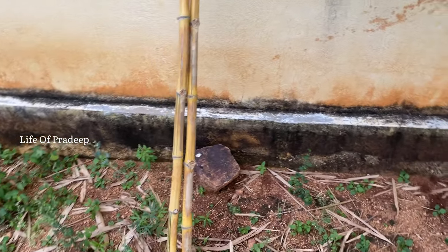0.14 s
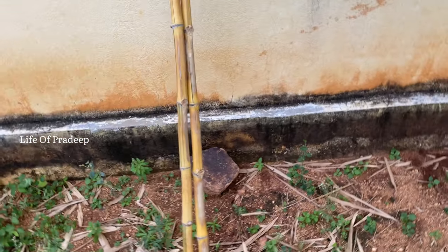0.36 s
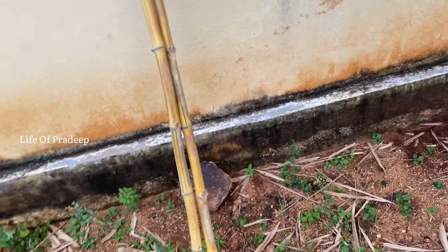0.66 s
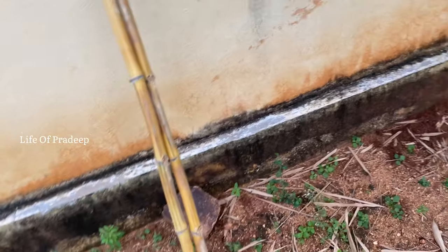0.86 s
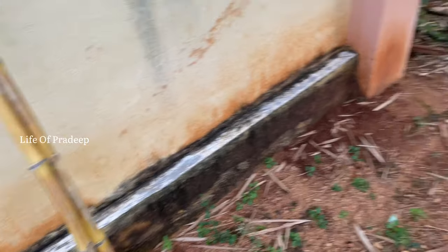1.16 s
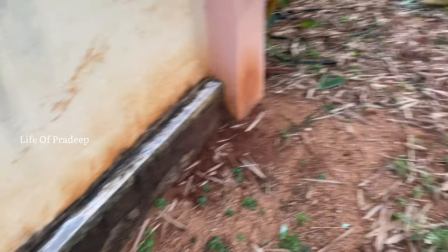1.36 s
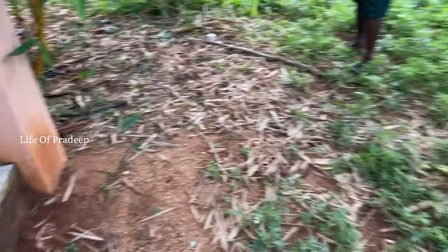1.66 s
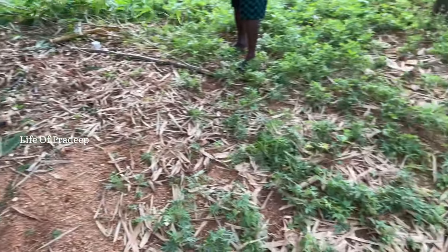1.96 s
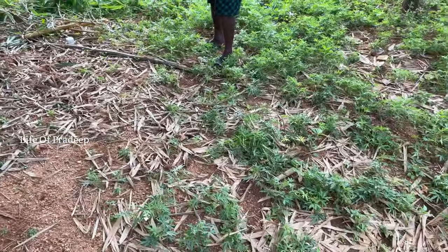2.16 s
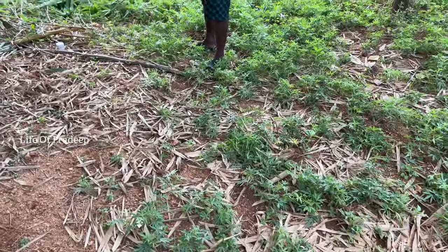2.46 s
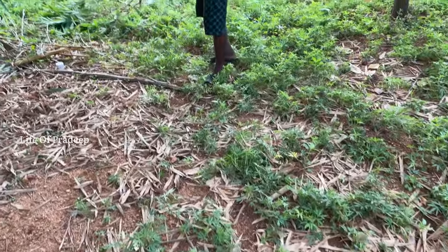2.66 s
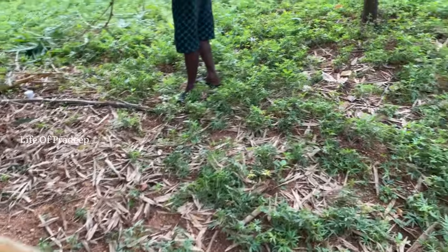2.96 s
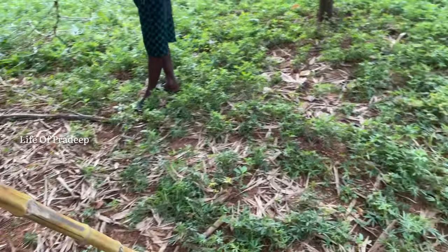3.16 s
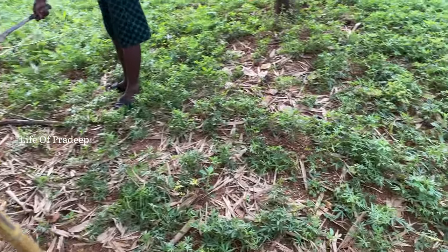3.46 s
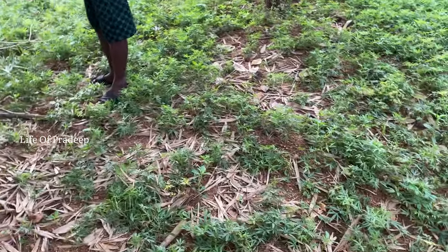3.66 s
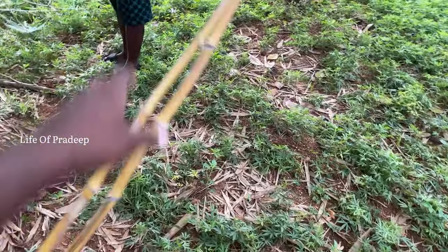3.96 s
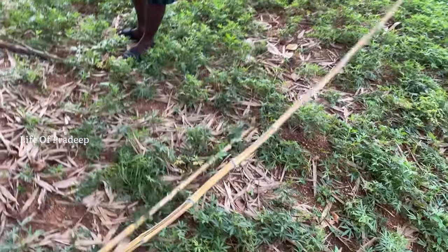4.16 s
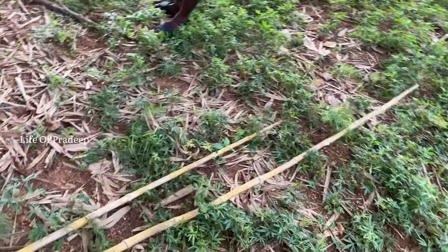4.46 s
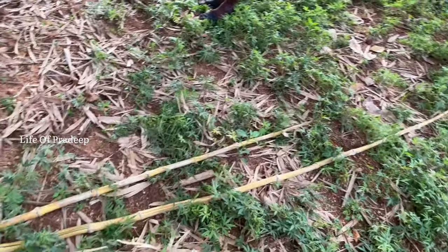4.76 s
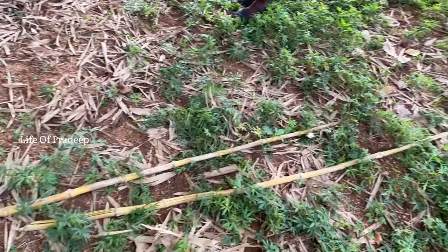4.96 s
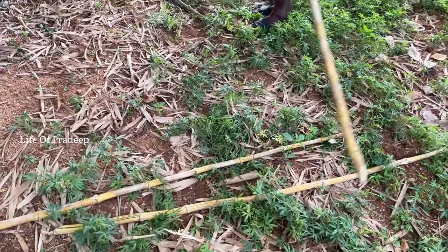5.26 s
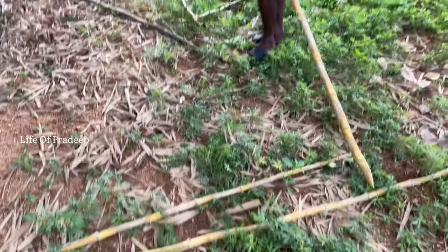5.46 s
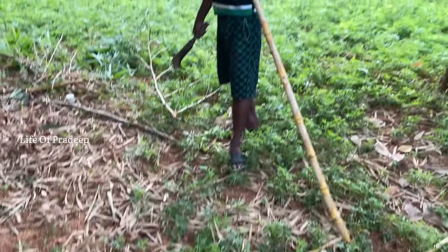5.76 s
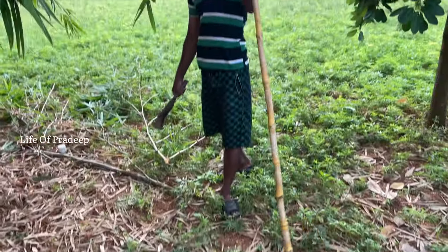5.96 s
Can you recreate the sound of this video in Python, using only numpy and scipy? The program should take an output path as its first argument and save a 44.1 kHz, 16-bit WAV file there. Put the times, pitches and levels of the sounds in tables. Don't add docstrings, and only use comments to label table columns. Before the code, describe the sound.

Outdoors, close to one microphone, the tail of a bamboo blow and shaking leaves fade at 0 s. Low soft steps, small twig ticks and light brushes of dry litter follow until a sharp, bright knife chop cracks at 1.74 s, with a very short hollow ring and rustling leaves. A small tap comes at 2.84 s, a second chop at 3.19 s, then a hard woody knock at 3.33 s and splinter ticks. A pole slides free at 3.9 s, poles clack around 4.0 s, and two crash into leaves at 4.16 and 4.27 s with low soil thuds, then bounce and rattle until 4.6 s. After quiet gritty ticks, the loudest, lower chop lands at 5.33 s, ringing slightly longer. Leaves settle; dry snaps and a brush end near 6.05 s. Faint traffic rumble, a wavering distant motor and thin insect trills continue beneath, with faint short echoes.

```python
import sys
import numpy as np
from scipy import signal
from scipy.fft import rfft, irfft
from scipy.io import wavfile
from scipy.ndimage import uniform_filter1d

SR = 44100
rng = np.random.default_rng(int(sys.argv[2]) if len(sys.argv) > 2 else 0)


def generate_wav(signal):
    frames = np.transpose(np.atleast_2d(signal))
    scaled = np.clip(frames, -1, 1) * 32767
    pcm = np.round(scaled).astype(np.int16)
    wavfile.write(sys.argv[1], SR, pcm)


def convert_level_to_amplitude(level_db):
    exponent = np.asarray(level_db, float) / 20
    return 10 ** exponent


N = 269451

# start_s, level_db, pitch_hz, tear_s, t60_s
KNIFE_BLOWS = [
    (1.7412, -3.5, 2640, 0.0098, 0.012),
    (3.194, -5.5, 2640, 0.0081, 0.049),
    (5.3321, -0.5, 1890, 0.0077, 0.073),
]
# start_s, level_db, pitch_hz, tear_s, t60_s
EARLIER_BLOW = [
    (0, -8, 2100, 0.0035, 0.1),
]
# pitch_hz, level_db, t60_s
STEM_MODES = [(1640, 18.5, 0.03), (1930, 0, 0.11), (2190, -4, 0.078), (2440, 0, 0.088), (2690, 17, 0.023),
              (3200, -29, 0.074), (4120, -35, 0.078), (5670, 9, 0.03)]
# start_s, level_db, pitch_hz, t60_s
WALL_GROANS = [
    (1.742, -16, 1080, 0.05),
    (1.743, -10, 2300, .03),
    (3.195, -20, 620, 0.07),
    (3.196, -2.5, 2140, 0.025),
    (4.019, -23, 930, 0.19),
    (4.166, -17, 2000, 0.1),
    (5.334, -8, 1900, 0.12),
    (5.333, -11, 3700, .08),
]
# start_s, level_db, pitch_hz, t60_s
CHAMBER_RINGS = [(1.742, -41, 970, .025), (1.743, -37, 593, 0.07), (1.745, -25, 317, 0.048),
                 (1.7438, -5, 5670, 0.03), (1.743, -18, 1700, 0.027), (1.742, -4.5, 2880, 0.037),
                 (2.84, -25, 314, 0.037), (3.195, -11.5, 1886, 0.051), (3.195, -25, 1023, 0.05),
                 (3.196, -24, 552, 0.044), (3.327, -15, 1163, 0.021), (3.911, -32.5, 630, 0.033),
                 (3.914, -30, 1130, .04), (4.019, -21.5, 678, 0.066), (4.021, -40, 1080, 0.086),
                 (4.021, -43, 458, 0.11), (4.168, -15, 350, 0.04), (4.168, -48, 620, 0.025),
                 (4.286, -19, 713, 0.096), (3.991, -34, 890, 0.026), (5.339, -18, 986, 0.052),
                 (5.336, -18, 695, 0.085), (5.337, -8, 1640, .055), (5.34, -9, 2190, 0.05),
                 (5.338, -27, 325, 0.084)]
# start_s, level_db, first_hz, last_hz, length_s
PITCH_GLIDES = [
    (2.8372, -30, 1150, 330, .011),
    (1.742, -7, 1400, 3700, .019),
]
# start_s, level_db, pitch_hz, t60_s, hiss_db
POLE_CRASHES = [
    (4.1633, 4, 4440, 0.021, -16),
    (4.268, 4.5, 3660, 0.0089, -6),
    (4.278, 4, 2500, 0.023, -3.5),
    (4.2857, -5, 1880, 0.092, -5.5),
]
# start_s, level_db, pitch_hz, tear_s, t60_s
POLE_SLIDE = [
    (3.9093, -10.5, 2380, 0.011, 0.04),
]
# start_s, level_db, pitch_hz, t60_s, hiss_db
POLE_KNOCKS = [
    (3.3265, 1, 2730, 0.021, -34),
    (3.989, -6.5, 3700, 0.056, -12.5),
    (4.0172, -6.5, 2600, 0.059, -27),
    (4.39, -12, 3200, 0.018, -24),
    (3.401, -13.5, 2900, 0.04, -22),
]
# start_s, level_db, pitch_hz, t60_s
SOIL_THUDS = [(.355, -41, 56, 0.15), (0.393, -29.5, 102, 0.046), (1.751, -33, 129, 0.11),
              (3.196, -33, 316, 0.072), (3.25, -34, 259, 0.15), (3.911, -37, 208, 0.057),
              (3.993, -32.5, 118, 0.13), (4.019, -40, 110, 0.21), (4.167, -5.5, 150, 0.037),
              (4.194, -24.5, 85, 0.06), (4.245, -35, 200, 0.037), (4.273, -11, 142, 0.071),
              (4.284, -20, 240, 0.048), (4.355, -21.5, 209, 0.045), (4.476, -34, 217, 0.057),
              (4.629, -40, 132, 0.075), (4.651, -45, 189, .072), (5.349, -17, 124, 0.062),
              (5.362, -24.5, 165, 0.083), (5.508, -37.5, 134, 0.074), (5.642, -48, 147, 0.1)]
# start_s, level_db, pitch_hz, t60_s
DEEP_HEAVES = [
    (.125, -42, 70, .12),
    (.2, -39, 58, .2),
    (.29, -38, 62, .12),
    (4.175, -13, 95, .05),
    (4.288, -17, 80, .08),
    (5.35, -24, 200, .07),
]
# start_s, level_db, pitch_hz, hiss_db
TWIG_TICKS = [(0.2473, -19, 5770, -13), (0.7985, -23.5, 4590, -10.5), (1.402, -25, 6640, -6),
              (1.6132, -32, 1090, 6), (1.8591, -20, 1300, -10.5), (3.024, -34, 8380, -2),
              (3.052, -27, 3500, -4), (3.2174, -18, 1870, -5), (3.6591, -28, 4920, -16),
              (4.0738, -15, 2660, -16), (4.3962, -15, 1730, -19), (4.4897, -13.5, 1990, -10),
              (4.5035, -13, 1900, -14), (4.51, -14, 2040, -35), (4.5135, -12, 7300, -28),
              (4.593, -19, 2400, -4), (4.618, -21, 3530, -10.5), (4.8205, -37, 7620, 6),
              (5.0693, -32, 7000, -13), (5.285, -35, 1250, -38), (5.398, -21, 3470, 7.5),
              (5.4994, -23, 4500, 4), (5.5978, -29.5, 8000, -1), (5.8013, -21.5, 3200, 0)]
# start_s, level_db, pitch_hz, hiss_db
SPLINTER_SNAPS = [(3.2405, -15, 9500, -4), (3.286, -22, 8000, -5), (3.32, -26, 5000, -10),
                  (4.014, -17, 8500, -20), (4.067, -16.5, 5000, -22), (4.104, -25, 8200, -8),
                  (6.038, -16, 5000, -13), (6.063, -25, 5000, -10), (6.099, -17, 3950, -4),
                  (1.635, -32.5, 6000, -4)]
# start_s, level_db, pitch_hz, t60_s, hiss_db
SETTLING = [(1.753, -11, 2930, .1, -1.5), (3.206, -13.5, 2380, 0.12, 2.5), (3.238, -27, 4000, 0.13, 4),
            (3.332, -20, 3000, 0.074, -13), (3.997, -25.5, 3100, 0.059, 3), (5.356, -16, 2400, 0.12, -15),
            (.12, -41, 444, 1, -30), (2.05, -39, 560, .3, -20), (3.251, -34, 300, 0.31, -30),
            (5.94, -28.5, 1000, 0.26, -30)]
# start_s, level_db, pitch_hz, hiss_db
LITTER_BRUSHES = [(.379, -29, 3410, -8), (0.743, -26.5, 2090, 2), (1.47, -32, 2200, 0.1),
                  (1.4183, -29.5, 3770, 7), (3.932, -25, 3060, -1), (4.065, -21, 2650, -19),
                  (4.1, -19, 2900, -8), (4.157, -28, 4480, -10), (4.175, -9.5, 3600, -5),
                  (4.2363, -33, 4440, -4), (4.2998, -8.5, 3550, -6), (4.44, -16, 3060, -6),
                  (4.5316, -26, 4400, -16), (4.704, -23, 2800, -5), (4.7676, -30, 4400, -17),
                  (5.03, -40, 1600, -10), (5.238, -37, 3500, -16), (5.4596, -29, 3520, 0),
                  (5.5025, -20.5, 3240, -7), (5.762, -40.5, 4970, 3), (5.8016, -29, 2940, -7),
                  (5.8784, -32, 1790, -4), (5.948, -27.5, 2680, 7.5), (6.035, -10.5, 4150, -8)]
# start_s, level_db, pitch_hz, hiss_db
LITTER_SWEEPS = [
    (0.664, -29, 4840, -2.1),
    (.7135, -27, 3760, 2.8),
    (1.015, -44, 1860, 14.5),
    (1.399, -34, 1930, 7),
    (4.999, -45, 2400, 14),
]
TEAR_S = dict(knock=0.0027, crash=0.0035, wall=0.0043, twig=.001, splinter=.003, swish=0.0043, aftermath=.01, sweep=0.012)
T60_S = dict(twig=0.034, splinter=0.026, swish=0.055, sweep=0.21)
# pitch_hz, level_db (per Hz)
LEAF_SPECTRUM = [(150, -11), (250, -4.5), (436, -4.5), (629, -2.5), (971, -1), (1700, 2.5), (5730, 5),
                 (9660, 3), (13000, -2.5), (14900, 0.5), (16000, 3)]
# peak_s, level_db, swell_db_per_s, settle_db_per_s, extra_fizz_db
LEAF_SHAKES = [(0, -29, 99, 119, -1), (0, -37.5, 99, 34, -0.7), (.85, -51.5, 26, 40, 0.4),
               (1.62, -63, 36, 15, -2), (1.25, -61.5, 19, 16, 1), (1.9, -42, 80, 36.5, 1.3),
               (1.8, -43, 403, 52, 1.2), (2.3, -49.5, 18.5, 11.5, 1), (2.8, -56, 26, 57.5, -1.5),
               (3.12, -55.5, 65, -8, -10), (3.24, -37, 395, 46, 0.5), (3.43, -43, 64, 26.5, 1.2),
               (4.03, -47.5, 73, 23, -9), (4.37, -43, 59, 43, 2), (4.5, -42, 35, 86, -1),
               (4.58, -44, 46, 122, -6), (4.95, -55.5, 38, 77, 1), (5.1, -63, 40, 10, -5),
               (5.44, -53.5, 187.5, 14, -2), (5.88, -48.5, 83, -1, -0.5), (6.11, -44, 57, 50, 1.5)]
# start_s,
# level_db, pitch_hz, hiss_db
GRIT_TICKS = [(.856, -30, 3800, -10), (.9, -32, 6500, -10), (0.93, -30, 7000, -8), (1.418, -23, 6560, -12),
              (1.612, -27, 4600, -15), (5.013, -29, 8770, -8), (5.02, -28, 10500, -10),
              (5.028, -23, 10000, -15), (5.036, -26, 9800, -15), (4.7, -23, 3000, -8),
              (5.07, -22, 9000, -4), (5.238, -28, 5300, -14), (5.227, -37, 11500, -20),
              (5.322, -36, 11000, -10), (4.7673, -28, 4200, -14), (4.593, -23, 5500, -10),
              (4.074, -13, 5600, -20), (4.097, -22.5, 4500, -15), (3.321, -13, 3800, -4),
              (3.321, -20, 1100, -30), (3.218, -16, 5000, -8), (5.935, -30, 1500, -25),
              (1.7393, -16, 2200, -6), (3.191, -20, 3000, -10), (4.385, -20, 3500, -8),
              (4.473, -20, 2900, -15), (4.509, -12, 2000, -25), (4.509, -16, 6500, -20),
              (4.515, -12, 3400, -20), (4.515, -15, 1900, -25), (4.533, -19, 4000, -15),
              (4.617, -23, 4400, -6), (.2475, -22, 7200, -15), (.382, -28, 1180, -20),
              (6.066, -26, 3000, -15), (5.575, -30, 3200, -15), (5.602, -31, 3200, -15)]
# start_s, level_db, pitch_hz, t60_s, hiss_db
STRIP_RATTLES = [
    (3.4, -22.5, 1050, .05, -30),
    (4.021, -18.5, 1700, .12, -14),
    (4.03, -25, 800, .12, -30),
    (4.078, -25, 2300, .06, -25),
    (4.11, -29, 2300, 0.07, -8),
    (3.95, -31, 2300, 0.1, -15),
    (5.505, -25.5, 2180, .09, -15),
    (6.04, -25, 1500, 0.07, -25),
]
# pitch_hz, level_db (per Hz)
RUMBLE_SPECTRUM = [(15, -47.5), (25, -10), (45, 1), (64, 8.5), (136, 2.5), (198, -4), (264, -6.5),
                   (404, -13.5), (500, -44), (650, -27), (1100, -120)]
# time_s, level_db
RUMBLE_LEVEL = [(0.0, -47.5), (0.4, -57.5), (2.1, -53.5), (2.6, -57.5), (4.1, -56.5), (4.45, -45),
                (4.7, -57), (5.0, -60), (6.11, -54.5)]
# shaft_order, level_db
MOTOR_ORDERS = [(4, -66), (6, -63), (7, -58.5), (8, -65), (9, -69), (11, -71), (2.3, -62)]
# time_s, speed_hz
MOTOR_SPEED = [(0.5, 27.7), (0.62, 27.6), (2.3, 28.4), (2.44, 28.0), (3.0, 29.0)]
# time_s, level_db
MOTOR_LEVEL = [(0, -9), (.6, -5), (1.0, 0), (1.7, 0), (2.7, -2), (3.1, -10), (6.11, -12)]
# pitch_hz, width_hz, level_db
INSECT_TRILLS = [(7600, 120, -65), (5740, 400, -68), (6500, 150, -72)]
# pitch_hz, level_db (per Hz)
STILL_TREES = [(300, -12), (600, -12.5), (1500, -2.5), (2300, -5.5), (3200, -21), (5300, -16),
               (9000, -13.5), (16000, -23)]


def evened(x):
    return x / np.sqrt(np.mean(x ** 2) + 1e-20)


def add(mix, start_s, sound):
    part = mix[round(start_s * SR):][:len(sound)]
    part += sound[:len(part)]


def highpass(x, order, hz):
    return signal.sosfilt(signal.butter(order, hz, "high", fs=SR, output="sos"), x)


def resonate(x, hz, width_hz):
    r = np.exp(-np.pi * width_hz / SR)
    return evened(signal.lfilter([1, 0, -1], [1, -2 * r * np.cos(2 * np.pi * hz / SR), r * r], x))


def band(x, low_hz, high_hz):
    return evened(signal.sosfilt(signal.butter(2, [low_hz, high_hz], "band", fs=SR, output="sos"), x))


def coloured(x, spectrum):
    hz, level_db = np.transpose(spectrum)
    bins_hz = np.fft.rfftfreq(len(x), 1 / SR)
    gain = convert_level_to_amplitude(np.interp(np.log(bins_hz + 1), np.log(hz + 1), level_db))
    return evened(irfft(rfft(x) * gain, len(x)))


def snaps(size, spread_db, grain):
    sizes = np.minimum(rng.exponential(1, size // grain + 1), 5)
    lumps = np.repeat(sizes, grain)[:size]
    return evened(rng.standard_normal(size) * convert_level_to_amplitude(spread_db * lumps))


def crack(start_s, level_db, pitch_hz, tear_s, t60_s, hiss_db, click_db, ring_db, rise_s, lead_s, sharp,
          treble_speed, trim_db, lumps_db=3.0, size=12000):
    t = np.arange(size) / SR - lead_s
    after = np.maximum(t - tear_s, 0) / t60_s
    touch = convert_level_to_amplitude(-12.5 + 14 * np.minimum(t, 0) / lead_s)
    tearing = 1 - np.exp(-np.maximum(t, 0) / rise_s)
    fibres = snaps(size, lumps_db, grain=22) * np.maximum(touch, tearing)
    fibres[round(lead_s * SR)] += convert_level_to_amplitude(click_db)

    width_hz = pitch_hz / sharp
    body = resonate(resonate(fibres, pitch_hz, width_hz), pitch_hz, 3 * width_hz) * convert_level_to_amplitude(-60 * after)
    hiss = band(fibres, min(1.26 * pitch_hz, 7000), 11940) * convert_level_to_amplitude(hiss_db - 60 * treble_speed * after)

    u = np.arange(3500) / SR
    modes = sum(convert_level_to_amplitude(db - 60 * u / decay_s) * np.sin(2 * np.pi * hz * u) for hz, db, decay_s in STEM_MODES)
    ring = signal.fftconvolve(fibres * convert_level_to_amplitude(-120 * after), modes)[:size]
    ring = 2 * convert_level_to_amplitude(ring_db) * ring / abs(ring).max()

    sound = highpass(body + hiss + ring, 2, 0.1 * pitch_hz)
    return max(start_s + 0.00063 - lead_s, 0), convert_level_to_amplitude(level_db + trim_db) * sound


def thump(start_s, level_db, pitch_hz, t60_s, swell_s, noise, sag, heave_db):
    t = np.arange(12000) / SR
    turns = pitch_hz * (t + sag * 0.016 * (1 - np.exp(-t / 0.012)))
    rough = noise * resonate(rng.standard_normal(len(t)), pitch_hz, pitch_hz * 0.81)
    tone = np.sin(2 * np.pi * turns) + rough
    heave = convert_level_to_amplitude(heave_db) * np.sin(2 * np.pi * turns * 0.536)
    envelope = convert_level_to_amplitude(level_db - 60 * t / t60_s) * (1 - np.exp(-t / swell_s))
    return start_s, envelope * (tone + heave)


def glide(start_s, level_db, first_hz, last_hz, length_s):
    t = np.arange(3000) / SR
    glide_s = length_s * .35
    turns = last_hz * t + (first_hz - last_hz) * glide_s * (1 - np.exp(-t / glide_s))
    envelope = convert_level_to_amplitude(level_db - 40 * (t / length_s) ** 2) * np.minimum(t / .0015, 1)
    return start_s, envelope * np.sin(2 * np.pi * turns)


def knife_blows():
    out = np.zeros(N)
    for row in KNIFE_BLOWS:
        hiss_db = -15 + 22 * np.log2(row[2] / 2000)
        add(out, *crack(*row, hiss_db, click_db=20.5, ring_db=-4, rise_s=0.00011, lead_s=.003,
                        sharp=0.98, treble_speed=2.1, trim_db=-8.5))
    tail = crack(*EARLIER_BLOW[0], -6, click_db=0, ring_db=-7, rise_s=0.0002, lead_s=0.00104,
                 sharp=0.91, treble_speed=3.2, trim_db=-7)[1]
    add(out, 0, tail[100:])
    for s, db, hz, t60_s in WALL_GROANS:
        add(out, *crack(s, db, hz, TEAR_S["wall"], t60_s, -17, click_db=10, ring_db=-9, rise_s=0.00047,
                        lead_s=.0025, sharp=1.32, treble_speed=1.7, trim_db=-12))
    for row in CHAMBER_RINGS:
        add(out, *thump(*row, swell_s=0.0023, noise=.55, sag=.02, heave_db=-30))
    for row in PITCH_GLIDES:
        add(out, *glide(*row))
    return out


def thrown_poles():
    out = np.zeros(N)
    for s, db, hz, t60_s, hiss_db in POLE_KNOCKS:
        add(out, *crack(s, db, hz, TEAR_S["knock"], t60_s, hiss_db, click_db=24.5, ring_db=-12,
                        rise_s=0.00031, lead_s=0.0018, sharp=1.67, treble_speed=1.3, trim_db=-16))
    heavy = [(s, db, hz, TEAR_S["crash"], t60_s, hiss_db) for s, db, hz, t60_s, hiss_db in POLE_CRASHES]
    heavy.append((*POLE_SLIDE[0], -1.5))
    for row in heavy:
        add(out, *crack(*row, click_db=12.5, ring_db=-12, rise_s=0.00043, lead_s=.007,
                        sharp=1.28, treble_speed=1.6, trim_db=-12, lumps_db=2.4))
    for row in SOIL_THUDS:
        add(out, *thump(*row, swell_s=0.003, noise=0.52, sag=0.23, heave_db=-10))
    return out


def twigs_and_splinters():
    out = np.zeros(N)
    for kind, table in [("twig", TWIG_TICKS), ("splinter", SPLINTER_SNAPS)]:
        for s, db, hz, hiss_db in table:
            add(out, *crack(s, db, hz, TEAR_S[kind], T60_S[kind], hiss_db, click_db=14, ring_db=-24,
                            rise_s=0.00074, lead_s=0.000904, sharp=1.8, treble_speed=1.5, trim_db=-13))
    return out


def brushed_litter():
    out = np.zeros(N)
    soft = [(s, db, hz, TEAR_S["swish"], T60_S["swish"], hiss_db) for s, db, hz, hiss_db in LITTER_BRUSHES]
    soft += [(s, db, hz, TEAR_S["aftermath"], t60_s, hiss_db) for s, db, hz, t60_s, hiss_db in SETTLING]
    for row in soft:
        add(out, *crack(*row, click_db=-20, ring_db=-47, rise_s=0.0051, lead_s=0.0048,
                        sharp=1, treble_speed=1, trim_db=-12, lumps_db=1.6))
    for s, db, hz, hiss_db in LITTER_SWEEPS:
        add(out, *crack(s, db, hz, TEAR_S["sweep"], T60_S["sweep"], hiss_db, click_db=-20, ring_db=-47,
                        rise_s=0.012, lead_s=0.011, sharp=1, treble_speed=1, trim_db=-12.5))
    return out


def scattered(dry_sound):
    t = np.arange(8000) / SR
    echoes = rng.standard_normal(len(t)) * (rng.random(len(t)) < .15)
    echoes = echoes * convert_level_to_amplitude(-60 * t / 0.48) * (t > .003)
    echoes = signal.lfilter([1, -.9], [1], echoes)
    echoes = echoes / np.linalg.norm(echoes)
    return dry_sound + convert_level_to_amplitude(-16) * signal.fftconvolve(dry_sound, echoes)[:N]


def patchy(shape, bins, frames):
    return evened(uniform_filter1d(uniform_filter1d(rng.standard_normal(shape), bins, 0), frames, 1))


def shaking_leaves():
    rustle = coloured(snaps(N, spread_db=.9, grain=40), LEAF_SPECTRUM)
    hz, t, z = signal.stft(rustle, SR, nperseg=256, noverlap=192)
    patches = patchy(z.shape, 6, 30)
    crackles = patchy(z.shape, 9, 3)
    z = z * convert_level_to_amplitude(1.3 * patches + 1.5 * np.maximum(crackles, 0) ** 1.5)

    peak_s, level_db, swell, settle, extra_db = np.transpose(LEAF_SHAKES)[:, :, None]
    blades_db = level_db - np.where(t < peak_s, abs(swell) * (peak_s - t), abs(settle) * (t - peak_s))
    stems_db = -7.5 + 0.94 * (blades_db + 45) - 45.5
    edges_db = blades_db + 3.5 + extra_db
    zones = [(hz < 1500, stems_db), ((hz >= 1500) & (hz < 6000), blades_db), (hz >= 6000, edges_db)]
    gain_db = np.zeros(z.shape)
    for zone, shakes_db in zones:
        wanted = convert_level_to_amplitude(2 * shakes_db).sum(0) + 1e-9
        present = (abs(z[zone]) ** 2).sum(0).mean()
        gain_db[zone] = 10 * np.log10(wanted / present)
    z = z * convert_level_to_amplitude(uniform_filter1d(gain_db, 7, 0) + 2.5)
    return signal.istft(z, SR, nperseg=256, noverlap=192)[1][:N]


def underfoot():
    out = np.zeros(N)
    for s, db, hz, hiss_db in GRIT_TICKS:
        add(out, *crack(s, db, hz, .0008, .014, hiss_db, click_db=14, ring_db=-50, rise_s=.0003, lead_s=.0006,
                        sharp=2.4, treble_speed=1.3, trim_db=-12, lumps_db=1.5, size=2000))
    for s, db, hz, t60_s, hiss_db in STRIP_RATTLES:
        add(out, *crack(s, db, hz, .005, t60_s, hiss_db, click_db=-10, ring_db=-40, rise_s=.002, lead_s=.002,
                        sharp=1.4, treble_speed=1.3, trim_db=-12, lumps_db=2.5, size=5000))
    for row in DEEP_HEAVES:
        add(out, *thump(*row, swell_s=.008, noise=.2, sag=.2, heave_db=-30))
    return out


def far_motor():
    t = np.arange(N) / SR
    shaft = np.cumsum(np.interp(t, *np.transpose(MOTOR_SPEED))) / SR
    tones = sum(convert_level_to_amplitude(db + 1.5) * np.sin(2 * np.pi * (order * shaft + rng.random())) for order, db in MOTOR_ORDERS)
    return tones * convert_level_to_amplitude(np.interp(t, *np.transpose(MOTOR_LEVEL)))


def insects():
    out = np.zeros(N)
    for hz, width_hz, db in INSECT_TRILLS:
        throb = evened(uniform_filter1d(uniform_filter1d(rng.standard_normal(N), 1500), 1500))
        out += convert_level_to_amplitude(db + 3 * throb) * resonate(rng.standard_normal(N), hz, width_hz)
    return out


def far_air():
    level_db = np.interp(np.arange(N) / SR, *np.transpose(RUMBLE_LEVEL))
    rumble = coloured(rng.standard_normal(N), RUMBLE_SPECTRUM) * convert_level_to_amplitude(level_db)
    air = convert_level_to_amplitude(-57.5) * coloured(rng.standard_normal(N), [(150, -43)] + STILL_TREES)
    return rumble + air


def scene():
    bamboo = scattered(knife_blows() + thrown_poles() + twigs_and_splinters() + brushed_litter())
    near = bamboo + shaking_leaves() + underfoot()
    far = far_motor() + insects() + far_air()
    return (near + far)[None]


def top_cut(x):
    return signal.sosfilt(signal.butter(12, 17040, fs=SR, output="sos"), x)


def record(dry):
    cut = highpass(dry, 4, 45)
    limited = 0.97 * np.tanh(cut / 1.022)
    edge = signal.firwin(511, 15900, window=("kaiser", 9), fs=SR)
    low = signal.oaconvolve(limited, edge[None], "same")
    loud = np.clip(uniform_filter1d(abs(limited), 300) / 0.057, 0, 1) ** 2
    mix = low + convert_level_to_amplitude(-28) * loud * (limited - low)
    return top_cut(mix)


dry = scene()
out = record(dry)
generate_wav(out)
```